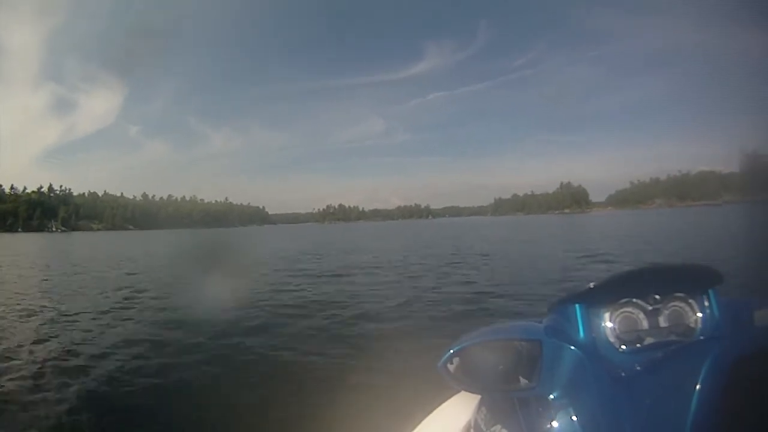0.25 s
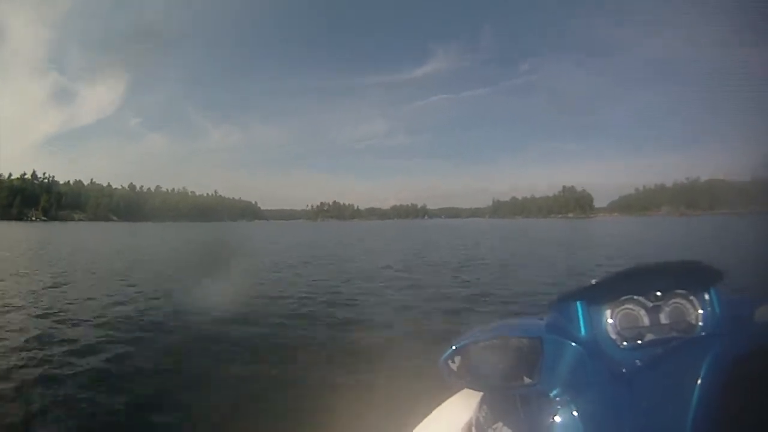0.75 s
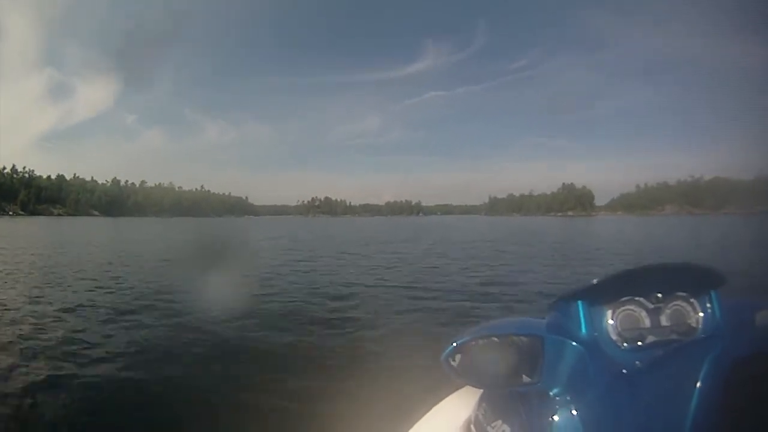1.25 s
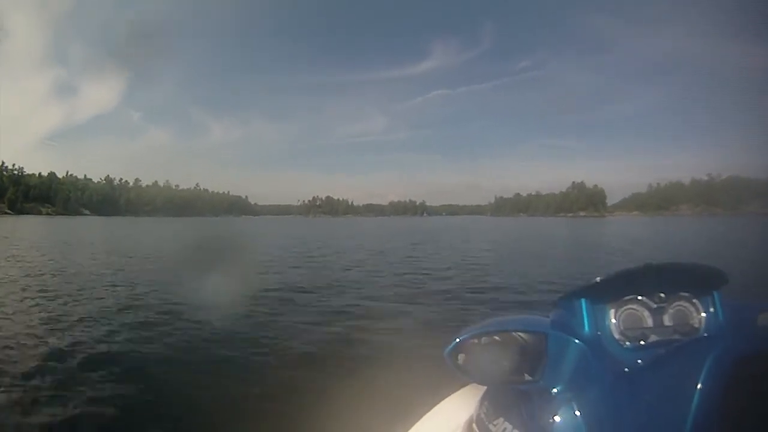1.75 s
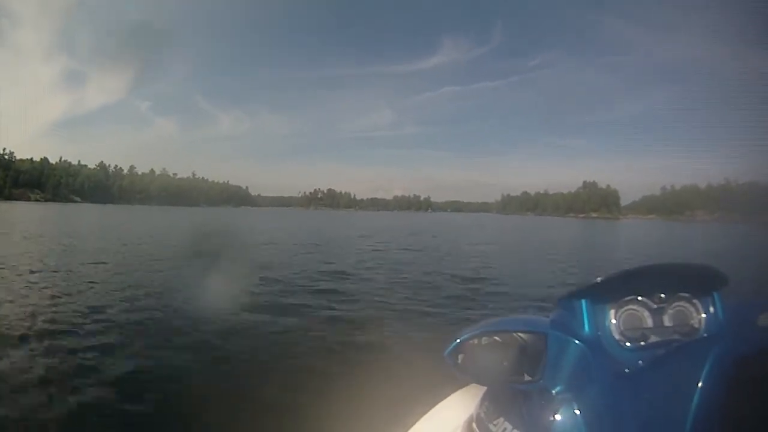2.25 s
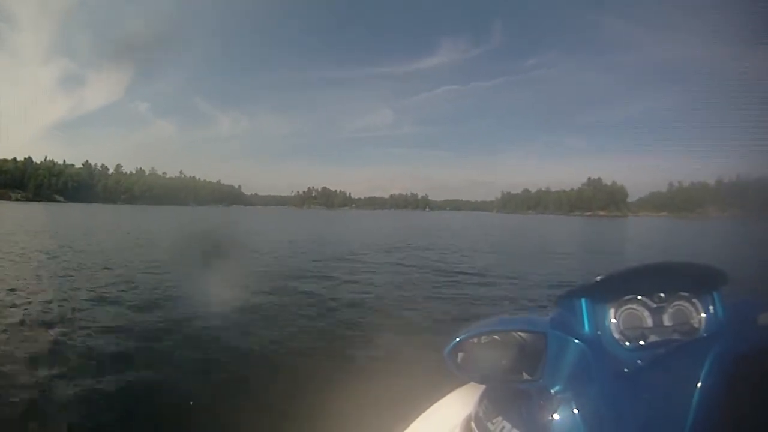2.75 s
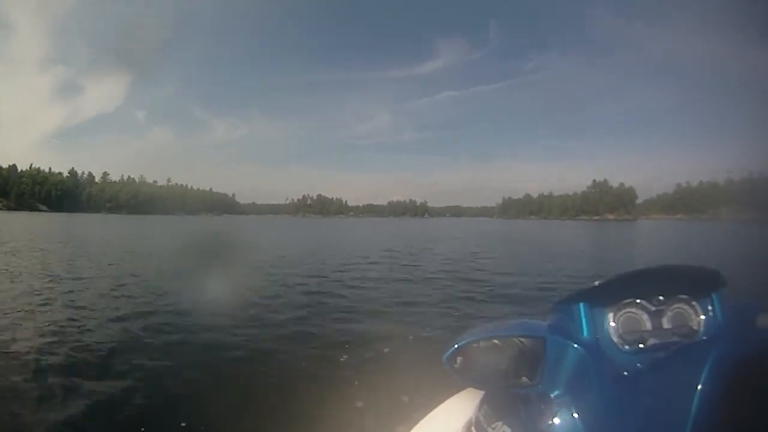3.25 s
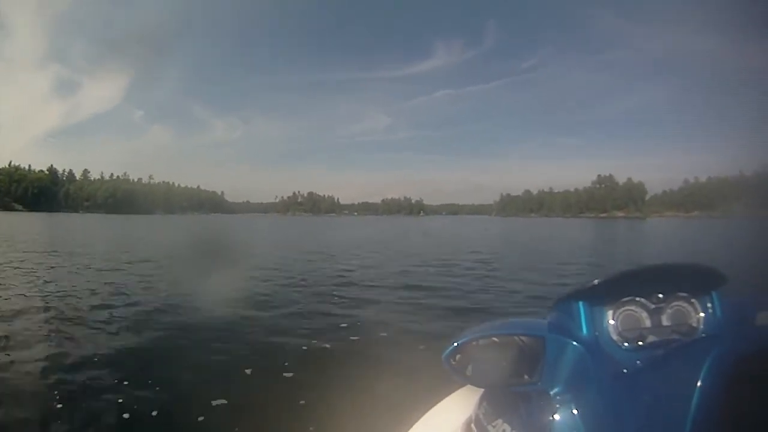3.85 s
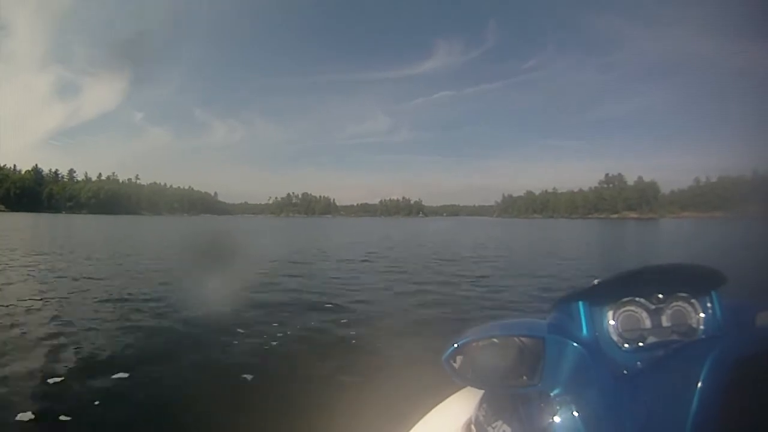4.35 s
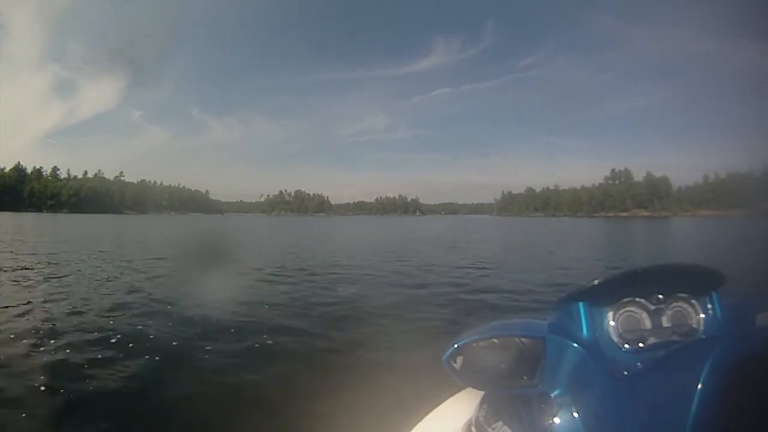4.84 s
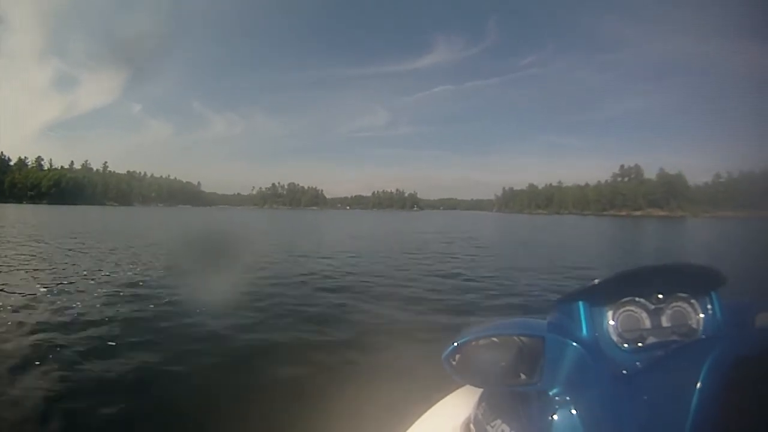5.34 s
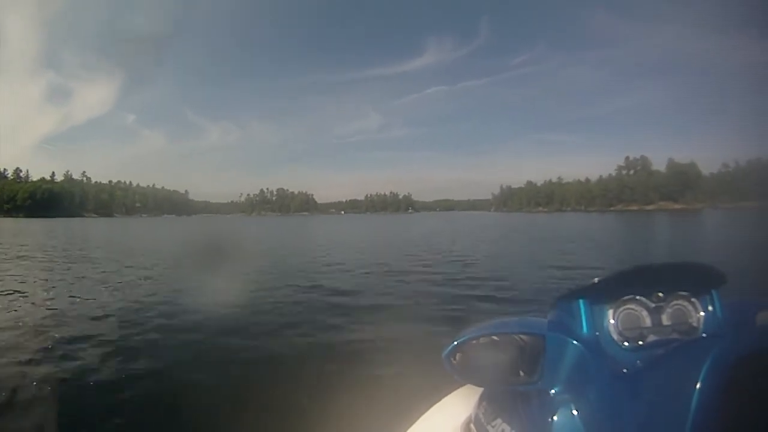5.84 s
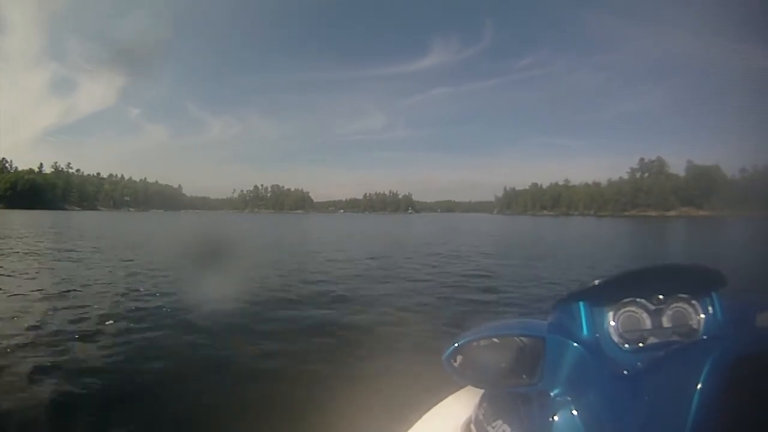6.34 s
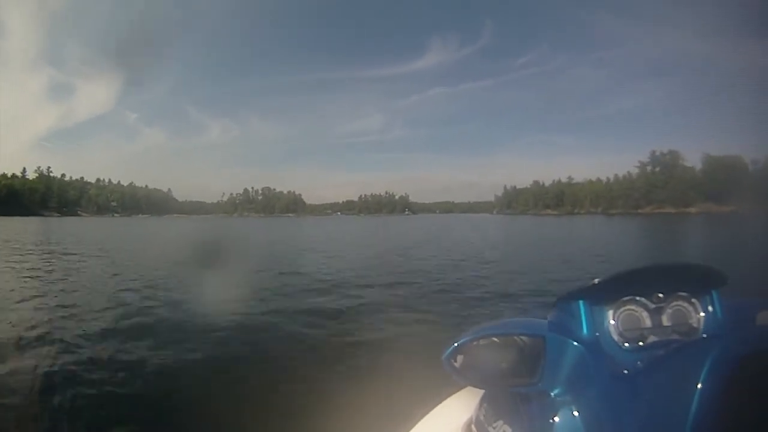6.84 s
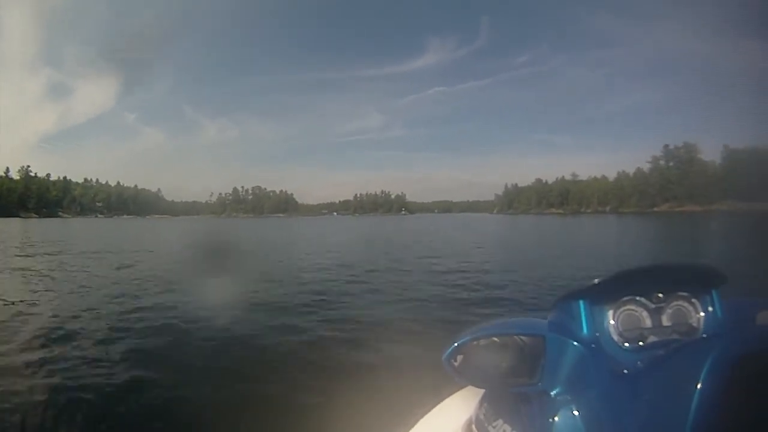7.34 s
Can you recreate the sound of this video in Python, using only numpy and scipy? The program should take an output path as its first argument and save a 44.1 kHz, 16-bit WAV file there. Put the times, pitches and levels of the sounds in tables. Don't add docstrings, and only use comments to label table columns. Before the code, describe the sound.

Close, loud, buzzing drone of a small jet craft cruising on calm water, hull thudding softly, casing ticking, the sound pumping at each slap.

```python
import sys
import numpy as np
from scipy import signal
from scipy.fft import rfft, irfft
from scipy.io import wavfile

SR = 44100
rng = np.random.default_rng(int(sys.argv[2]) if len(sys.argv) > 2 else 0)


def gain_from_decibels(decibels):
    exponent = np.asarray(decibels, float) / 20
    return 10 ** exponent


def int16_out(signal):
    q = np.round(np.clip(np.atleast_2d(signal).T, -1, 1) * 32767)
    wavfile.write(sys.argv[1], SR, q.astype(np.int16))


N = 334719

# (time [s], left limiter duck [dB], right limiter duck [dB])
SLAPS = [(0.027, 1, 8.5), (0.185, 11.5, 11), (0.311, 9.5, 8), (0.431, 9, 9.5), (0.641, 8, 8),
         (0.71, 8.5, 6.5), (0.812, 8.5, 5.5), (0.875, 11.5, 6), (0.951, 7.5, 9.5), (1.043, 11, 11.5),
         (1.103, 8.5, 7.5), (1.194, 10, 9.5), (1.26, 7, 7), (1.471, 8, 8), (2.085, 10, 9), (2.563, 10, 6),
         (2.636, 8, 7.5), (2.865, 7.5, 3.5), (2.93, 7, 3), (3.337, 13, 12), (3.438, 12, 11.5),
         (3.524, 5.5, 5), (3.651, 9.5, 8), (4.526, 9.5, 9), (4.585, 9, 8), (4.804, 7.5, 6),
         (5.076, 8, -2.5), (5.224, 7, 6.5), (5.359, 8, 6.5), (6.575, 11, 10)]


def rms_one(x):
    return x / np.sqrt(np.mean(x ** 2) + 1e-20)


def at_hz(points, hz):
    table_hz, level_db = np.transpose(points)
    return np.interp(np.log(hz), np.log(table_hz), level_db)


def drift(rate_hz):
    pole = np.exp(-80 * np.pi * rate_hz / SR)
    white = rng.standard_normal(N // 40 + 2002)
    slow = signal.lfilter([1], [1, -2 * pole, pole * pole], white)[2000:]
    return np.interp(np.arange(N) / 40, np.arange(len(slow)), rms_one(slow))


def order(turns, multiple, wobble_db, wander_rad):
    phase = 2 * np.pi * (multiple * turns + rng.random()) + wander_rad * drift(11.8)
    return np.sqrt(2) * gain_from_decibels(wobble_db * drift(9.9)) * np.sin(phase)


def ringing_noise(hz, width_hz):
    radius = np.exp(-np.pi * width_hz / SR)
    section = [1, 0, -1, 1, -2 * radius * np.cos(2 * np.pi * hz / SR), radius * radius]
    return rms_one(signal.sosfilt([section, section], rng.standard_normal(N)))


def banded_noise(spectrum, patchy_db, together_db):
    lowest_hz, highest_hz = spectrum[0][0], spectrum[-1][0]
    edges = lowest_hz * 2 ** np.arange(0, np.log2(highest_hz / lowest_hz), 1 / 3)
    out, together, white = 0, drift(16), rng.standard_normal((2, N))
    for k, (low, high) in enumerate(zip(edges, edges[1:])):
        sos = signal.butter(2, [low, high], "band", fs=SR, output="sos")
        band = signal.sosfilt(sos, white[k % 2])
        level_db = at_hz(spectrum, np.sqrt(low * high)) + together_db * together
        out = out + gain_from_decibels(level_db + patchy_db * drift(26)) * band
    return rms_one(out)


def engine(turns, drone_db, blade_db, buzz_db):
    # (multiple of shaft speed [1], level re drone [dB], wobble [dB])
    other_orders = [(0.478, -23.5, 3), (0.962, -35.5, 1), (3.014, -21, 2), (3.978, -27.5, 3.5),
                    (5.008, -28, -1.5), (6.97, -33.5, -10), (7.936, -22, 2.5), (9.99, -26, 3),
                    (10.986, -28, 4), (11.87, -31.5, -4), (16.4, -35, 7), (18.13, -36, 5.5),
                    (20.21, -38.5, 2), (22.2, -56, 0), (23.5, -51, 4)]
    tones = gain_from_decibels(drone_db - 2.0) * order(turns, multiple=2, wobble_db=0.47, wander_rad=0.18)
    tones = tones + gain_from_decibels(blade_db - 0.5) * order(turns, multiple=6, wobble_db=0.6, wander_rad=0.06)
    tones = tones + gain_from_decibels(buzz_db - 4.5) * order(turns, multiple=14, wobble_db=1.2, wander_rad=0.22)
    for multiple, level_db, wobble_db in other_orders:
        tones = tones + gain_from_decibels(level_db - 8) * order(turns, multiple, 0.6 * wobble_db, wander_rad=0.2)
    shaken = gain_from_decibels(0.95 * np.sin(2 * np.pi * 2 * turns))
    return tones + gain_from_decibels(buzz_db - 0.67) * shaken * ringing_noise(792.0, width_hz=115)


def water(turns, drone_db, spray_db):
    # (frequency [Hz], spectral density [dB/Hz])
    rumble_spectrum = [(11, -45), (18, -23), (54, -14), (81, 0), (112, 2.5), (134, 0.5), (209, -28),
                       (259, -16.5), (327, -8.5), (378, -16), (452, -9), (695, -26.5), (846, -24),
                       (1300, -48.5), (1690, -71), (2860, -120)]
    # (frequency [Hz], spectral density [dB/Hz])
    spray_spectrum = [(900, 3), (1100, -6.5), (1610, -9.5), (2040, -14), (2320, -14), (3300, -20.5),
                      (4280, -22.5), (4900, -28.5), (5500, -32.5), (7290, -33), (9500, -34.5), (11200, -36),
                      (13200, -40.5), (19000, -43)]
    # (frequency [Hz], bandwidth [Hz], level [dB])
    panel_modes = [(139.7, 25, -30.5), (304.2, 40, -32.5), (445.3, 55, -31), (475, 45, -29),
                   (618.5, 60, -31), (1089, 60, -41.5), (1472, 68, -45.5), (1995, 300, -44.5)]
    throb = np.sin(2 * np.pi * 2 * turns)
    rumble_db = -21 + 1.1 * (drone_db + 9)
    rumble = gain_from_decibels(rumble_db) * banded_noise(rumble_spectrum, patchy_db=0.5, together_db=-0.44)
    panels = 0
    for hz, width_hz, level_db in panel_modes:
        panels = panels + gain_from_decibels(level_db + 1.0 * drift(19)) * ringing_noise(hz, width_hz)
    spray_now_db = spray_db + 1.5 + 2.4 * throb ** 2 + 1.3 * drift(55)
    spray = gain_from_decibels(spray_now_db) * banded_noise(spray_spectrum, patchy_db=0.9, together_db=0.97)
    return rumble + thuds() + panels * gain_from_decibels(1.0 * throb) + spray


def thuds():
    # (time [s], peak level [dB])
    ripples = [(0.179, -14.5), (0.969, -15), (1.259, -16), (1.479, -18), (2.089, -15), (3.339, -18),
               (3.439, -22), (4.277, -11), (4.559, -14.5), (5.669, -16.5), (6.599, -15)]
    pushes = np.zeros(N)
    for time_s, peak_db in ripples:
        pushes[round(time_s * SR)] = gain_from_decibels(peak_db - 2.5)
    t = np.arange(round(0.1 * SR)) / SR
    envelope = np.e * t / 0.013 * np.exp(-t / 0.015)
    return signal.fftconvolve(pushes, np.sin(2 * np.pi * 45 * t) * envelope)[:N]


def case_rings(spray_db):
    # (frequency [Hz], bandwidth [Hz], level [dB], flicker [dB])
    case_modes = [(4245, 290, -56.5, 1.5), (6504, 310, -57.5, 2), (8590, 330, -69, 5), (12650, 600, -66, 2),
                  (13700, 500, -75.5, 2)]
    # (time [s], strength [dB])
    clear_ticks = [(0.0, 11), (0.722, 10.5), (0.893, 8.5), (1.018, 13), (1.097, 15), (1.221, 13.5),
                   (1.935, 10.5), (2.15, 12.5), (2.565, 11), (2.653, 7.5), (2.749, 12.5), (3.38, 15.5),
                   (3.499, 10.5), (3.546, 17), (3.669, 10), (4.135, 14.5), (4.289, 14.5), (4.321, 12),
                   (4.66, 13), (5.419, 10), (5.639, 10), (5.997, 13), (6.146, 16), (6.345, 15.5),
                   (6.46, 15), (6.593, 14), (6.632, 12), (7.117, 14), (7.288, 8), (7.426, 5)]
    rings = 0
    for hz, width_hz, level_db, flicker_db in case_modes:
        rings = rings + gain_from_decibels(level_db + flicker_db * drift(25)) * ringing_noise(hz, width_hz)

    faint_per_s = 4.1 + 1.8 * np.arange(N) / SR
    touches = (rng.random(N) < faint_per_s / SR) * gain_from_decibels(7.5 + 1.5 * rng.standard_normal(N))
    for time_s, *_ in SLAPS:
        touches[round(time_s * SR)] = gain_from_decibels(4.5)
    for time_s, strength_db in clear_ticks:
        touches[round(time_s * SR)] = gain_from_decibels(strength_db)
    bursts = signal.fftconvolve(touches, gain_from_decibels(-62.5) * np.hanning(700), "same")

    chirp_hz = 5850 + 170 * drift(120)
    chirp = np.sqrt(2) * np.sin(2 * np.pi * np.cumsum(chirp_hz) / SR)
    sos = signal.butter(1, [2500, 11000], "band", fs=SR, output="sos")
    shake = signal.sosfilt(sos, rng.standard_normal(N))
    return gain_from_decibels(spray_db + 39.0) * rings + bursts * (chirp + 1.3 * shake)


def hiss():
    # (frequency [Hz], spectral density [dB/Hz])
    hiss_spectrum = [(20, 26), (120, 19), (300, 15), (1000, 1.5), (3000, -0.5), (8000, -4), (15000, -7)]
    hz = np.maximum(np.arange(N // 2 + 1) * SR / N, 1)
    level = gain_from_decibels(-45 + 2.0 * drift(18))
    shaped = rfft(rng.standard_normal((2, N))) * gain_from_decibels(at_hz(hiss_spectrum, hz))
    return level * rms_one(irfft(shaped, N))


def surge_db():
    lag_s, width_s = 0.028, 0.04
    t = np.arange(0, N, 40) / SR
    humps = []
    for time_s, left_db, right_db in SLAPS:
        humps.append(max(left_db, right_db) * np.exp(-((t - time_s - lag_s) / width_s) ** 2))
    return np.interp(np.arange(N) / SR, t, np.max(humps, axis=0))


def scene():
    # (time [s], rotation rate [Hz])
    speed_curve = [(0.0, 53.5), (0.1, 52.7), (0.57, 54.2), (0.95, 54.0), (1.08, 54.6), (1.44, 53.3),
                   (1.88, 55.1), (2.49, 55.7), (3.0, 53.7), (3.23, 54.3), (3.28, 55.0), (3.53, 55.0),
                   (3.89, 56.2), (4.65, 54.3), (5.35, 57.2), (5.62, 55.9), (6.93, 55.6), (7.59, 57.4)]
    # (time [s], load about the mean [dB])
    load_curve = [(0, 0), (.13, -2.5), (.26, 1), (.6, 1.5), (.96, 0.5), (1.3, 0.7), (1.45, -4), (1.7, 0.8),
                  (2.2, -1), (2.45, 0.2), (3.2, -1.5), (3.4, 1.9), (3.62, -1.9), (3.841, 1.5), (4.2, -0.5),
                  (4.56, 2), (4.7, -3), (4.85, 0.47)]
    # (time [s], level about the mean [dB])
    looseness_curve = [(0, -4), (.6, -8), (.9, 0.5), (1.2, -3.5), (1.38, 0), (3.25, 0), (3.4, -2),
                       (4.2, -1.3), (7.59, 0.6)]
    t = np.arange(N) / SR
    speed_hz = np.interp(t, *np.transpose(speed_curve))
    load_db = np.interp(t, *np.transpose(load_curve))
    loose_db = np.interp(t, *np.transpose(looseness_curve))
    turns, surge = np.cumsum(speed_hz) / SR, surge_db()

    drone_db = -8 + load_db + 0.18 * surge + 0.2 * drift(1.4)
    blade_db = -21 + 0.22 * load_db - 0.1 * surge + 0.4 * drift(4.9)
    blade_db = blade_db + 6.5 * np.exp(-t / 0.2)
    buzz_db = -25.5 + loose_db - 0.86 * load_db - 0.42 * surge - 0.2 * drift(4)
    spray_db = -38.5 + 0.2 * load_db + 0.087 * surge + 0.26 * drift(1.6)
    spray_db = spray_db + 0.24 * (speed_hz - speed_hz.mean())
    craft = engine(turns, drone_db, blade_db, buzz_db) + water(turns, drone_db, spray_db)
    return craft + case_rings(spray_db) + hiss()


def port(x):
    # (frequency [Hz], bandwidth [Hz], cut [dB])
    notches = [(5570, 570, -4.5), (11200, 1200, -6)]
    for hz, width_hz, cut_db in notches:
        b, a = signal.iirpeak(hz, hz / width_hz, fs=SR)
        x = x + (gain_from_decibels(cut_db) - 1) * signal.lfilter(b, a, x)
    return x


def limiter_db(x):
    # (time [s], duck [dB])
    nicks = [(0.367, 6.5), (0.562, 4.5), (0.941, 6.5), (1.729, 6.5), (2.039, 4), (3.078, 4), (3.171, 3),
             (3.701, 2.5), (3.826, 3.5), (4.311, 5.5), (4.659, 4.5), (5.42, 5), (5.609, 3.5)]
    climb_db = 186 * np.arange(N) / SR
    reach = round(0.0025 * SR)
    swell_db, ducks_db, back_at_db = np.zeros(N), np.full((2, N), -99.), np.zeros(2)
    for time_s, *duck_db in sorted(SLAPS + [(s, db, 0) for s, db in nicks]):
        start = round(time_s * SR) - reach
        crest = start + np.argmax(np.abs(x[0, start:start + 2 * reach]))
        still_down_db = np.maximum(back_at_db - climb_db[crest], 0)
        crest_db = 20 * np.log10(np.abs(x[0, crest]))
        need_db = 0.016 * max(duck_db) + still_down_db.min() - crest_db
        lead = np.arange(max(crest - 1500, 0), crest + 8)
        rise_db = need_db * np.exp(np.minimum(lead - crest + 40, 0) / (0.0037 * SR))
        swell_db[lead] = np.maximum(swell_db[lead], rise_db)
        ducks_db[:, crest + 8] = duck_db
        back_at_db = np.maximum(back_at_db, climb_db[crest] + duck_db)
    held_db = np.maximum.accumulate(ducks_db + climb_db, axis=1)
    reduction_db = np.maximum(held_db - climb_db, 0)
    pole = np.exp(-1 / (0.0005 * SR))
    smooth = signal.lfilter([(1 - pole) ** 2], [1, -2 * pole, pole * pole], swell_db - reduction_db)
    stepped = smooth[:, np.arange(N) // 4 * 4]
    return smooth + 0.45 * (stepped - smooth)


def low_pass(x):
    return signal.sosfilt(signal.butter(12, 15220, fs=SR, output="sos"), x)


def record(dry):
    mismatch_db = 0.11 * drift(6) * np.array([[1], [-1]])
    heard = port(dry)
    limited = heard * gain_from_decibels(limiter_db(heard) + mismatch_db)
    return low_pass(np.clip(limited, -1, 1))


dry = scene()
out = record(dry)
int16_out(out)
```